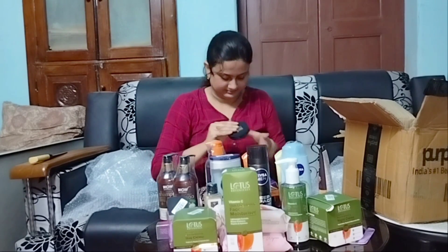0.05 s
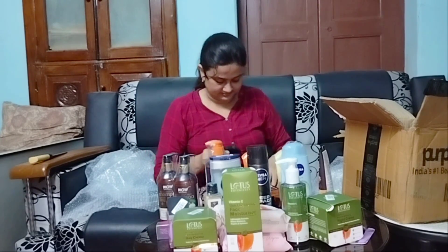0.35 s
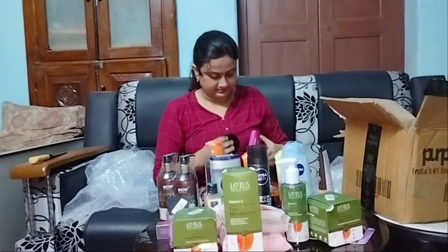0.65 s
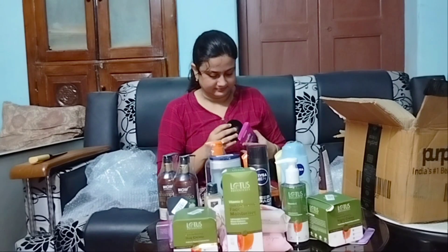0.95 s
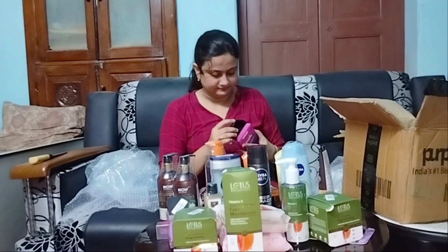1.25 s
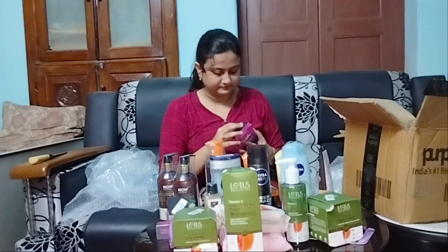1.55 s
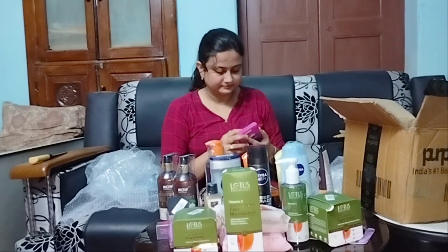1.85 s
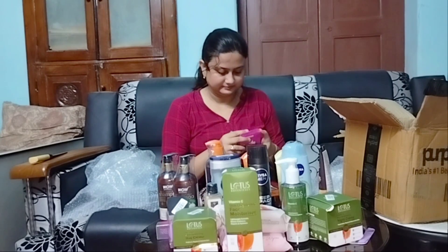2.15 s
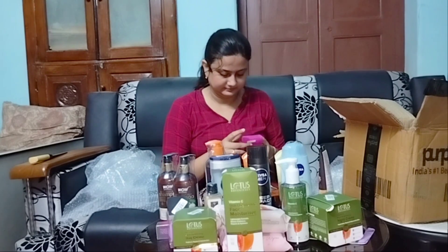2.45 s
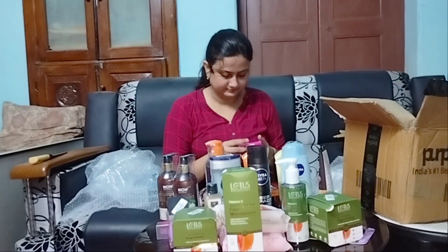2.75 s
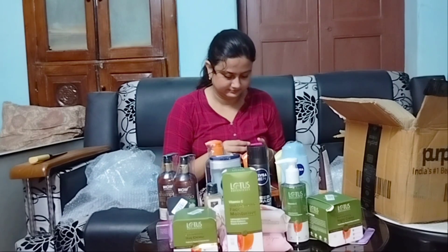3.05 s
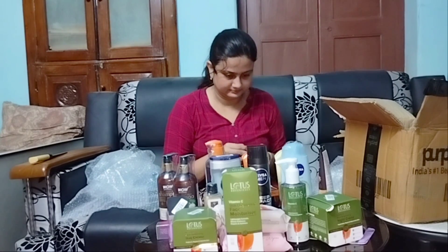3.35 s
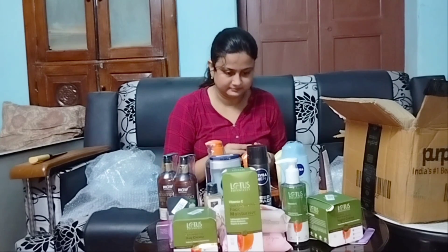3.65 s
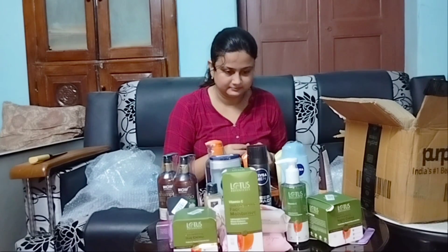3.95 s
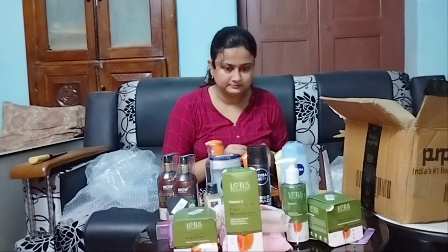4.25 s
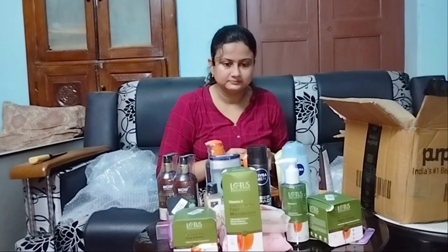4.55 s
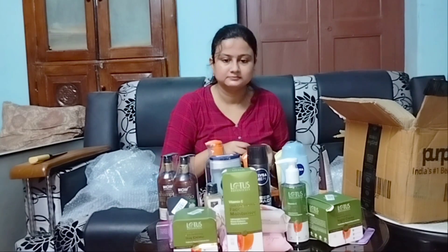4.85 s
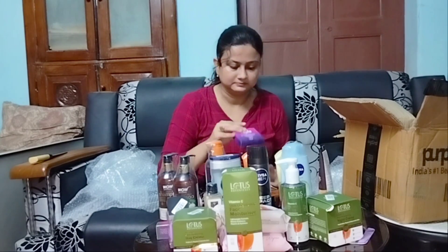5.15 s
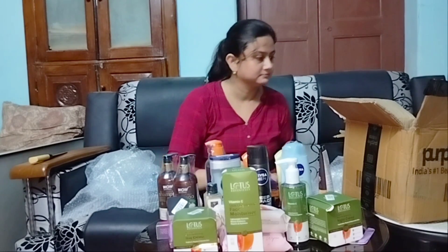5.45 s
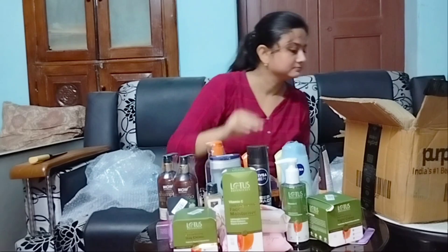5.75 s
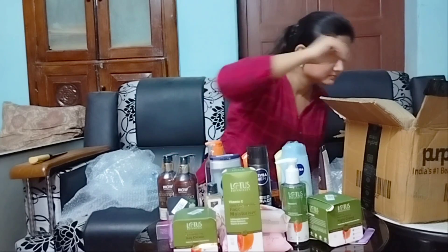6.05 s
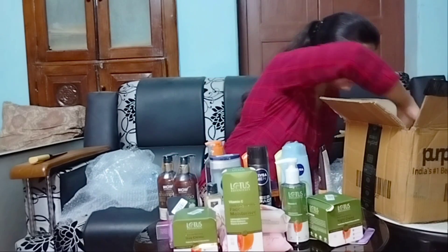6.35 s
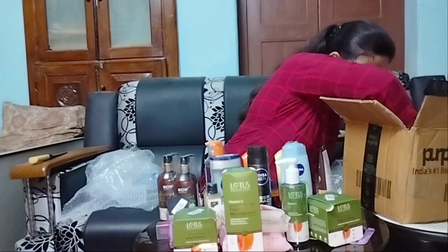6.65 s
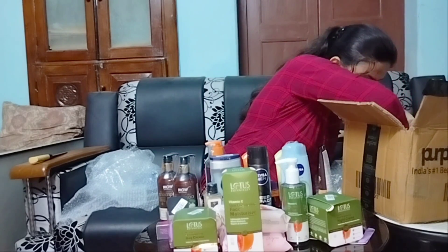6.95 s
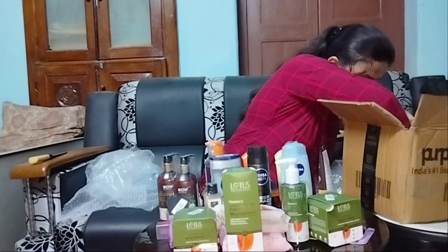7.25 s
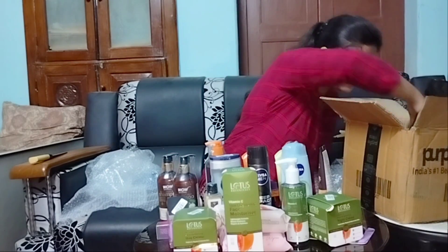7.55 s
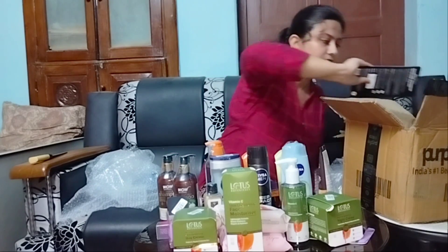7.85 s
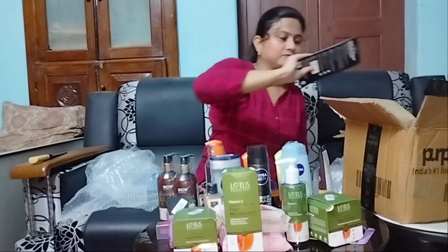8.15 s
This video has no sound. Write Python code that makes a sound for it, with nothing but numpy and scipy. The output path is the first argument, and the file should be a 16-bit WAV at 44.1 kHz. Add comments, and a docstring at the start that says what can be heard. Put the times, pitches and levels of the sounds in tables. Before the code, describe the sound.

Small plastic cosmetic containers are turned in the hands with light taps and rubs, and one is set on a table with a sharp knock. A lid snaps a few times, and another item clatters down. Then a sleeve rustles and a hand rummages in a cardboard box with soft bumps. The microphone is a few metres away in a slightly echoing room, where a clock ticks faintly over a steady hush.

```python
"""Small plastic cosmetic containers are turned in the hands, snapped shut and set down on a table;
then a sleeve rustles and a hand rummages in a cardboard box. Impacts and stick-slip friction excite
each object's damped normal modes; the rustle is a dense train of random impulses. At a phone a few
metres off, the reverberant field of the hard-walled room outweighs the direct sound. A clock ticks
faintly once a second over a steady hush."""
import sys
import numpy as np
from scipy import signal
from scipy.fft import rfft, irfft, next_fast_len
from scipy.io import wavfile

SR = 44100
rng = np.random.default_rng(int(sys.argv[2]) if len(sys.argv) > 2 else 0)


def store_pcm(level_fs):
    """Save levels as 16-bit WAV."""
    pcm = np.round(np.clip(level_fs, -1, 1) * 32767).astype(np.int16)
    wavfile.write(sys.argv[1], SR, np.atleast_2d(pcm).T)


N = 361619


def amp(db):
    """Amplitude ratio of a level in decibels."""
    return 10 ** (np.asarray(db) / 20)


def read(points, hz):
    """Interpolation of (frequency [Hz], value) points on a log-frequency axis."""
    f, value = np.transpose(points)
    return np.interp(np.log(np.maximum(hz, 1)), np.log(f), value)


def colour(x, points):
    """Zero-phase filtering by a curve of (frequency [Hz], gain [dB])."""
    size = next_fast_len(x.shape[-1] + 2048)
    gain = amp(read(points, np.arange(size // 2 + 1) * SR / size))
    return irfft(rfft(x, size) * gain, size)[..., :x.shape[-1]]


def unit(x):
    """Normalisation to rms 1."""
    return x / np.sqrt(np.mean(x ** 2) + 1e-30)


def band(x, hz, kind, order=2):
    """Causal Butterworth filtering."""
    sos = signal.butter(order, np.clip(hz, 5, SR / 2 - 500), kind, fs=SR, output="sos")
    return signal.sosfilt(sos, x)


def add(out, s, x):
    """Superposition of x on out from time s."""
    i = max(int(s * SR), 0)
    out[i:i + len(x)] += x[:N - i]


def slips(size, rate_hz, scatter_db):
    """Poisson process: impulses of uneven size at random moments."""
    happens = rng.random(size) < rate_hz / SR
    sign = rng.choice([-1, 1], size)
    strength = amp(scatter_db * np.clip(rng.standard_normal(size), -2, 2))
    return unit(happens * sign * strength)


def stroke(length_s):
    """Stick-slip friction: the jerky force of one slide swells and eases off."""
    jerks = slips(SR // 2, rate_hz=3000, scatter_db=4)[:int(max(length_s, .01) * SR)]
    return jerks * np.sqrt(np.hanning(len(jerks)))


# Normal modes of each object: (frequency [Hz], bandwidth [Hz], level [dB])
OBJECT_MODES = { "jar": [(430, 74, -30), (565, 18, -18), (660, 43, -21), (814, 62, 9), (983, 184, 16.5),
                (1675, 310, 11), (2020, 170, 13), (2160, 89, 15), (2830, 140, -33), (3930, 550, -39),
                (4870, 470, -8.5), (7600, 1800, -14), (13000, 2900, -32)], "rim": [(1090, 130, 18),
                (1040, 200, 5), (1360, 300, 7.5), (1940, 260, 12), (2540, 170, 12), (3720, 630, 2.5),
                (4720, 1700, -18), (8100, 1500, -25), (13300, 9300, -15)], "lid": [(930, 85, -11),
                (1996, 14, 5.5), (3090, 550, 0), (3680, 390, -7), (4920, 740, -4.5), (6320, 460, -8.5),
                (7970, 1130, -4.5), (10700, 2500, -16)], "case": [(620, 62, 5.5), (707, 44, 1.5),
                (1094, 19, 6), (2370, 170, -5.5), (3000, 620, -8.5), (3880, 750, -12.5), (4760, 950, -18),
                (6200, 130, -12), (8100, 1400, -20)], "cap": [(1330, 560, -11.5), (2690, 330, -2.5),
                (5200, 810, -7), (7800, 730, -21)], "palm": [(278, 29, 1.5), (390, 50, -11), (466, 51, -4),
                (595, 61, -8), (805, 67, -13), (2520, 2300, -24.5)], "table": [(295, 57, -15),
                (514, 35, -1), (635, 61, 6.5), (792, 73, 6), (940, 100, 2.5), (1310, 190, -1.5),
                (1660, 180, -2.5), (2000, 350, -3.5), (2430, 170, 4), (3520, 520, -11), (4570, 410, -7),
                (5640, 760, -30), (8200, 2500, -12.5), (13000, 3400, -41)], "base": [(571, 290, -7),
                (1100, 120, -0.5), (1200, 80, -8), (2230, 670, -21), (7660, 4100, -14)],
                "wall": [(120, 23, -17), (178, 31, -9), (290, 43, 4.5), (383, 44, 4.5), (562, 25, -7.5),
                (850, 99, -12), (1185, 130, -7.5), (1533, 53, -1.5), (2600, 810, -52), (5800, 9600, -28)],
                "flap": [(57, 10, 4.5), (89, 31, 6), (235.5, 22, 13.5), (266, 11, 9.5), (450, 47.3, -19),
                (930, 53, -14), (1340, 310, -10.5), (2400, 710, -18), (6800, 4700, -36.5)], }
def ring(modes, edge_db, edge_hz=2600, grip=0.021, near=0.25):
    """Modal impulse response: damped cosines, detuned by the grip; edge is treble gain against body."""
    hz, width, db = np.transpose(modes)[:, :, None]
    t = np.arange(SR // 8) / SR
    hz = hz * (1 + grip * rng.standard_normal(hz.shape))
    gain = width * amp(db + edge_db * hz ** 2 / (hz ** 2 + edge_hz ** 2))
    y = np.sum(gain * np.exp(-np.pi * width * t) * np.cos(2 * np.pi * hz * t), axis=0)
    y = band(y, 0.77 * hz.min(), "high", order=4)  # small bodies radiate little below their first mode
    # nearby hands and bottles reflect the treble: a different comb filter for each contact
    treble = band(y, 2500, "high")
    y = y + near * sum(np.roll(treble, int(lag_s * SR)) for lag_s in rng.uniform(.0005, .007, size=5))
    return y / np.sqrt(np.sum(y ** 2))


def slide(length_s, db, edge_db, name):
    """Forced vibration: a friction force convolved with the object's impulse response."""
    return amp(db) * signal.fftconvolve(stroke(length_s), ring(OBJECT_MODES[name], edge_db, near=0.074))


# Sliding contacts: (time [s], duration [s], level [dB], edge [dB], object)
SLIDING_CONTACTS = [ (0.00, 0.02, -39, 1, "cap"), (0.62, 0.067, -70, 15, "lid"),
                    (0.848, 0.023, -57.5, 26, "jar"), (1.125, 0.044, -49.5, -18, "rim"),
                    (1.245, 0.047, -57.5, -44, "rim"), (1.337, 0.047, -52.5, 10, "rim"),
                    (1.586, 0.043, -41.5, 32, "rim"), (1.626, 0.016, -33, -11, "jar"),
                    (2.106, 0.052, -58.5, 15, "lid"), (2.55, 0.072, -53.5, 1, "lid"),
                    (3.382, 0.091, -48.5, 10, "lid"), (3.941, 0.028, -56.5, -25, "lid"),
                    (4.128, 0.028, -65.5, -2, "lid"), (4.381, 0.049, -54.5, -6, "lid"),
                    (4.421, 0.031, -48.5, 4, "lid"), (4.571, 0.034, -58.5, 7, "case"),
                    (5.421, 0.21, -48, -3, "lid"), (6.841, 0.021, -54, -8, "lid"),
                    (7.056, 0.033, -54.5, -12, "wall"), (7.16, 0.032, -45, -6, "wall"),
                    (7.154, 0.16, -47.5, -9, "table"), (7.318, 0.14, -54, -16, "table"),
                    (7.665, 0.024, -44, 22, "flap"), ]
def rubs(names):
    """Frictional excitation: surfaces sliding on each other drive the named objects' modes."""
    out = np.zeros(N)
    for s, length_s, db, edge_db, name in SLIDING_CONTACTS:
        if name in names:
            add(out, s, slide(length_s, db, edge_db, name))
    return out


# Narrow-band skids, plus the 3.3 kHz ring of the clock's first tick at 0.858 s: (time [s], duration [s],
# frequency [Hz], bandwidth [Hz], level [dB])
RESONANT_SKIDS = [(0, 0.069, 2820, 350, -57.5), (0.659, 0.031, 2060, 300, -69),
                  (0.858, 0.046, 3310, 400, -59.5), (0.433, 0.21, 5480, 800, -76),
                  (1.118, .032, 4420, 910, -56), (2.399, 0.024, 3810, 300, -55.5),
                  (3.021, 0.18, 5900, 810, -67), (3.241, 0.069, 2530, 1040, -64.5),
                  (3.336, 0.066, 2530, 617, -56), (3.616, 0.025, 1870, 218, -55.5),
                  (5.96, 0.24, 181, 40, -68.5), (6.332, 0.053, 3040, 1930, -54.5),
                  (7.241, 0.047, 2430, 1000, -49.5), (7.667, 0.021, 970, 120, -53)]
def scuffs():
    """Resonance: fingers and smooth surfaces skid, exciting a single band; the band at 0.858 s is the clock's
    tick ringing near 3.3 kHz."""
    out = np.zeros(N)
    for s, length_s, hz, width, db in RESONANT_SKIDS:
        resonance = band(stroke(length_s), [hz - width / 2, hz + width / 2], "band")
        add(out, s, amp(db) * unit(resonance))
    return out


def fingers(until_s=4.3, fade_s=0.67, db=-79):
    """Random impulse excitation: shifting fingertips tick faintly on the lid."""
    activity = np.clip((until_s - np.arange(N) / SR) / fade_s, 0, 1)
    jerks = slips(N, rate_hz=170, scatter_db=13.5) * activity
    return amp(db) * signal.fftconvolve(jerks, ring(OBJECT_MODES["lid"], edge_db=3, near=0))[:N]


# Difference between the two microphone ports: (frequency [Hz], side minus mid [dB])
SIDE_LEVEL = [(50, -22), (125, -14), (250, -10), (500, -6.5), (1000, -1.5), (3000, 0)]
def diffuse_noise(size):
    """Diffuse-field coherence: two close ports are alike in the bass, unrelated in the treble."""
    mid, side = rng.standard_normal((2, size))
    side = colour(side, SIDE_LEVEL)
    return np.array([mid + side, mid - side])


# Spectrum of the still room: (frequency [Hz], relative spectral density [dB])
HUSH_SPECTRUM = [(15, -48), (25, -35), (66, -19), (96, -12.5), (209, -5), (240, -7.5), (389, -6),
                 (433, -8.5), (552, -8.5), (1140, -16.5), (1300, -20), (1660, -24), (1850, -19.5),
                 (4620, -29.5), (15500, -33.5)]
def hush(db=-69.5):
    """Stationary diffuse noise: the steady background of the house."""
    noise = colour(diffuse_noise(N), HUSH_SPECTRUM)
    return amp(db) * noise / noise.mean(axis=0).std()


# Normal modes of the clock's case: (frequency [Hz], bandwidth [Hz], level [dB])
CLOCK_MODES = [(2043, 38, -2.5), (2174, 210, -5), (3310, 99, -11.5), (5480, 125, -12.5)]
def clock(first_s=.838, gears_s=0.063, gears_db=-55, tick_delay_s=.01, tick_db=-28):
    """Periodic excitation: once a second a tick and a short chirr of gears ring the case."""
    out = np.zeros(N)
    for s in np.arange(first_s, N / SR, 1):
        case = ring(CLOCK_MODES, edge_db=0, grip=0.011, near=0)
        add(out, s, amp(gears_db) * signal.fftconvolve(stroke(gears_s), case))
        add(out, s + tick_delay_s, amp(tick_db) * case)
    return out


def impact_force(edge_db, push_s=.000006, graze_s=0.007, chatter_s=0.0015):
    """Contact time limits bandwidth: graze, main push and chatter are smoothed more in a dull blow."""
    t = np.arange(-(SR // 100), SR // 100) / SR
    graze = 0.016 * np.exp(-abs(t) / graze_s)
    chatter = 0.12 * np.exp(-abs(t) / chatter_s)
    force = rng.standard_normal(len(t)) * np.where(t < 0, graze, chatter)
    force[len(t) // 2] = 1  # the main push
    half_width_s = push_s * amp(-2 * edge_db)  # equals push_s at an edge of 0 dB
    return signal.fftconvolve(force, np.exp(-(t / half_width_s) ** 2), "same")


def impact(db, edge_db, name):
    """Impulsive excitation of an object; returns the sound and its lead before the main push [s]."""
    force = impact_force(edge_db)
    tap = signal.fftconvolve(force, ring(OBJECT_MODES[name], edge_db))
    return amp(db) * tap / np.linalg.norm(tap), len(force) / SR / 2


# Rebound of each object: (first gap [s], level lost per rebound [dB], edge lost per rebound [dB])
REBOUND_LOSSES = {"jar": (.012, 17.3, 0), "rim": (.007, 12, 14), "cap": (0.0079, 13, 0),
                  "case": (0.01, 17, 0), "palm": (.03, 6.6, 0), "table": (.015, 12, 1.6),
                  "base": (.0045, 2.4, 0), "wall": (.023, 6.7, 0), "flap": (0.0168, 9.3, 29)}
# Blows: (time [s], level [dB], edge [dB], skid duration [s], object)
BLOWS = [ (0.8899, -14.5, -9.5, 0.15, "jar"), (1.096, -29, 18, 0, "cap"), (1.372, -19, 20, 0.0044, "jar"),
         (1.438, -24.5, -14.5, .03, "rim"), (1.580, -7.5, 18, 0.013, "rim"), (1.627, -5.5, 12, 0, "table"),
         (1.649, 5, -5.5, 0, "jar"), (1.677, -8, 4, 0, "table"), (2.532, -24.5, 12, .06, "palm"),
         (4.422, -10, -6, 0, "case"), (5.422, -12.5, -7, 0.00077, "base"),
         (5.446, -15, -7, 0.000045, "base"), (5.461, -6.5, -6, .09, "table"),
         (5.557, -5.5, -7, 0.051, "table"), (6.945, -10.5, -15.5, .035, "wall"),
         (7.105, -14.5, -9.5, 0, "wall"), (7.201, -10, -13, 0.094, "wall"), (7.683, -9.5, 4.5, 0, "flap"),
         (7.752, -20.5, -16, 0.064, "flap"), ]
def taps(names, gap_ratio=.7, skid_db=-42, skid_edge_db=2.5):
    """Inelastic collision: each blow rebounds twice, ever weaker and sooner, and may dull or skid."""
    out = np.zeros(N)
    for s, db, edge_db, skid_s, name in BLOWS:
        if name in names:
            gap_s, loss_db, dull_db = REBOUND_LOSSES[name]
            hit_s = s
            for k in range(3):
                tap, lead_s = impact(db - k * loss_db, max(edge_db - k * dull_db, -24), name)
                add(out, hit_s - lead_s, tap)
                hit_s += gap_s * gap_ratio ** k
            if skid_s > 0:
                add(out, s, slide(skid_s, db + skid_db, edge_db + skid_edge_db, name))
    return out


# Closures of the lid's catch: (time [s], level [dB], edge [dB])
CLOSURES = [(2.412, -25.5, 14), (2.779, -14.5, 6), (3.618, -14, 21)]
def snaps(drag_lead_s=.007, drag_s=0.015, drag_db=-27, drag_edge_db=3):
    """Friction, then impact: the catch drags over the lip of the lid and clicks home."""
    out = np.zeros(N)
    for s, db, edge_db in CLOSURES:
        click, lead_s = impact(db, edge_db, "lid")
        add(out, s - lead_s, click)
        add(out, s - drag_lead_s, slide(drag_s, db + drag_db, edge_db + drag_edge_db, "lid"))
    return out


# Spectrum of sleeve and wrapping: (frequency [Hz], relative spectral density [dB])
CRINKLE_SPECTRUM = [(60, -27), (200, -7.5), (600, -11), (1200, -1.5), (2400, 1.5), (4000, 1), (6500, -1.5),
                    (8500, -1), (11000, -2.5), (15000, -7.5)]
# The arm reaches over, gropes in the box and lifts a pack out: (time [s], duration [s], level [dB])
ARM_MOVEMENTS = [ (5.768, 0.24, -62.5), (5.935, .19, -52.5), (6.188, .17, -52.5), (6.44, 0.11, -64),
                 (6.832, 0.011, -50.5), (6.927, 0.023, -55.5), (7.109, 0.027, -53), (7.142, 0.02, -46),
                 (7.265, 0.14, -56), (7.503, 0.17, -62.5), (7.652, 0.08, -55), (7.785, 0.15, -59.5),
                 (7.95, 0.21, -63.5), ]
def rustle(attack_s=0.006, settle_s=0.041):
    """Incoherent addition: the crinkling of each movement swells, holds and settles; powers sum."""
    t = np.arange(N) / SR
    power = np.zeros(N)
    for s, length_s, db in ARM_MOVEMENTS:
        swell = np.clip((t - s) / attack_s, 0, 1)
        settle = np.exp(-np.maximum(t - s - length_s, 0) / settle_s)
        power += (amp(db) * swell * settle) ** 2
    crinkles = colour(slips(N, rate_hz=2500, scatter_db=13), CRINKLE_SPECTRUM)
    return np.sqrt(power) * unit(crinkles)


# Decay of the room: (frequency [Hz], reverberation time T60 [s])
REVERBERATION_TIMES = [(100, 0.6), (300, 0.41), (800, 0.45), (2200, 0.56), (5000, 0.54), (9000, 0.47),
                       (15000, 0.41)]
def reverberation(build_s=0.008, bloom_db=3, bloom_s=0.043):
    """Reverberant decay: a diffuse field builds up, then dies exponentially at each octave's own rate."""
    t = np.arange(int(.8 * SR)) / SR
    spectrum = rfft(diffuse_noise(len(t)))
    octave = np.log2(np.maximum(np.linspace(0, SR / 2, spectrum.shape[1]), 1))
    centres = np.log2(125) + np.arange(8)
    tail = 0
    for centre, share in zip(centres, np.eye(len(centres))):
        part = irfft(spectrum * np.interp(octave, centres, share), len(t))
        tail = tail + part * amp(-60 * t / read(REVERBERATION_TIMES, 2 ** centre))
    tail = tail * (1 - np.exp(-t / build_s)) * amp(bloom_db * np.exp(-t / bloom_s))
    return unit(tail) / np.sqrt(len(t))


def room(x, lag_s, direct_db, early_db=-5, early_s=.028, spacing_s=.00035):
    """Multipath propagation: direct sound (lag_s later at the right port), wall echoes and a tail."""
    response = reverberation()
    delays = rng.uniform(.002, early_s, size=16)
    echoes = rng.choice([-1, 1], size=16) * np.exp(-delays / early_s)
    slant = spacing_s * rng.uniform(-.5, .5, size=16)  # each echo comes from its own direction
    for port, arrival, direct_s in zip(response, (delays - slant, delays + slant), (0, lag_s)):
        np.add.at(port, (arrival * SR).astype(int), amp(early_db) * echoes / np.linalg.norm(echoes))
        port[int(direct_s * SR)] += amp(direct_db)
    response /= np.linalg.norm(response.mean(axis=0))
    return signal.fftconvolve(x[None], response, axes=1)[:, :N]


def scene():
    """Superposition: hands, table and box radiate from three places in the same room."""
    in_hand = ["jar", "rim", "lid", "case", "cap", "palm"]
    on_table, cardboard = ["table", "base"], ["wall", "flap"]
    containers = rubs(in_hand) + scuffs() + fingers() + taps(in_hand) + snaps()
    hands = room(containers + clock(), lag_s=0, direct_db=-7.0)
    table = room(rubs(on_table) + taps(on_table), lag_s=.00009, direct_db=-6.5)
    box = room(rustle() + taps(cardboard) + rubs(cardboard), lag_s=.00013, direct_db=-7.5)
    return hands + table + box + hush()


# Frequency response of the microphone: (frequency [Hz], gain [dB])
MIC_RESPONSE = [(30, 10), (60, 3), (8600, -0.5), (9500, -6), (16000, -11.5)]
def record(dry, left_db=6.0, right_db=-0.5, cutoff_hz=15800):
    """Band limiting: the phone's response falls in the top octave, more on the right, then cuts off."""
    heard = [colour(colour(x, MIC_RESPONSE), [(10000, 0), (12500, shelf_db)])
             for x, shelf_db in zip(dry, (left_db, right_db))]
    return signal.sosfilt(signal.ellip(10, .2, 70, cutoff_hz, fs=SR, output="sos"), heard)


dry = scene()
out = record(dry)
store_pcm(out)
```